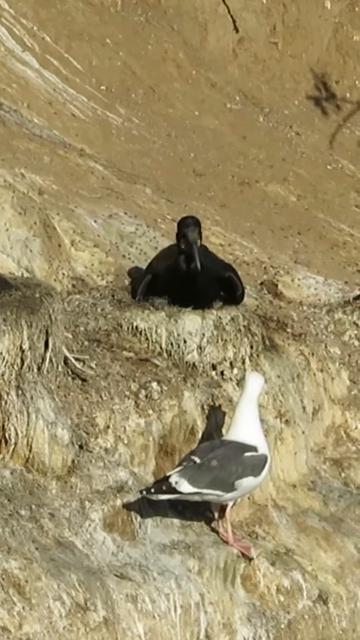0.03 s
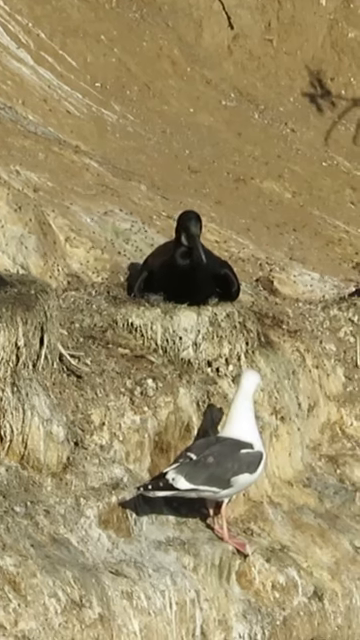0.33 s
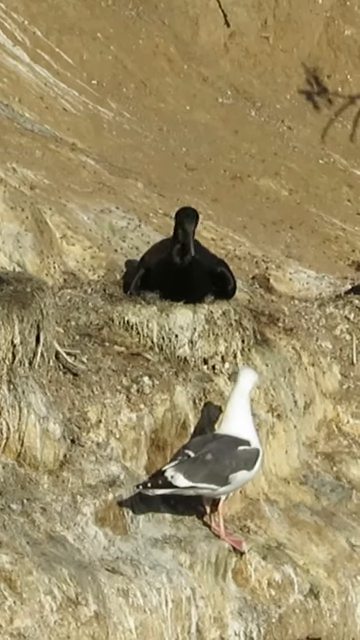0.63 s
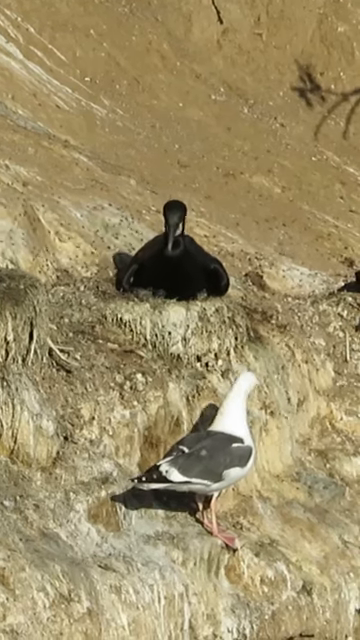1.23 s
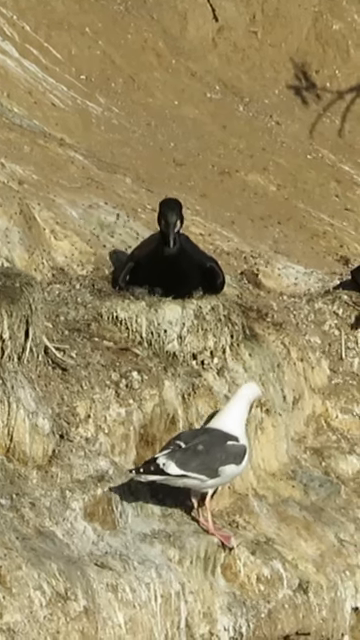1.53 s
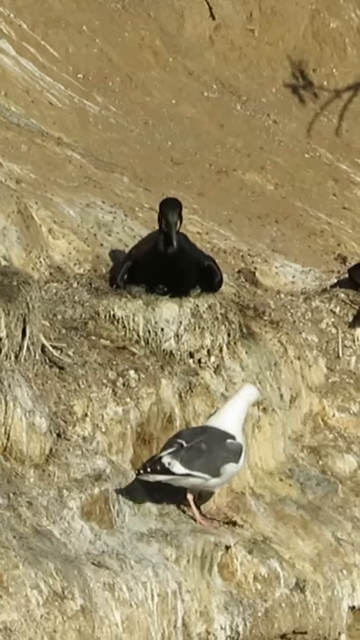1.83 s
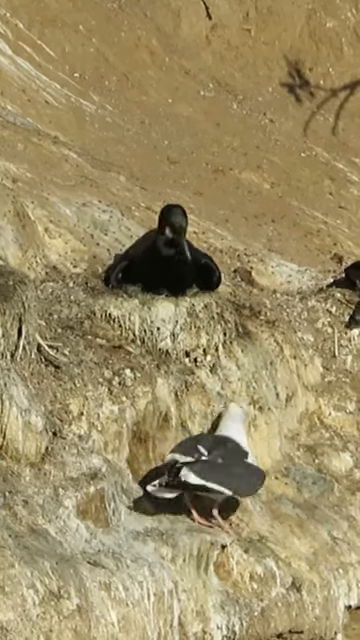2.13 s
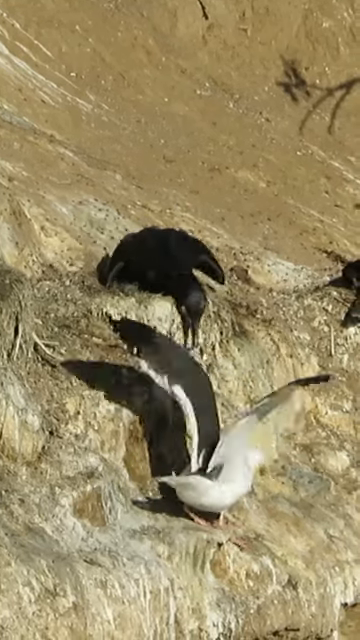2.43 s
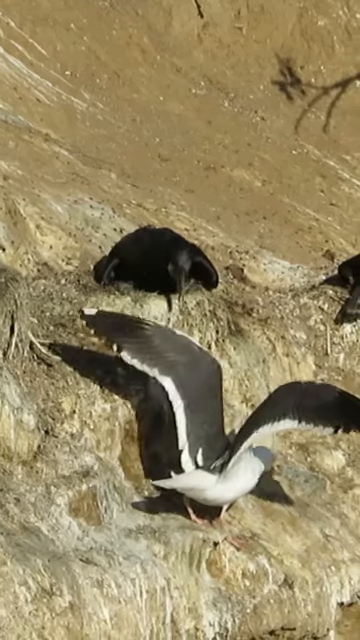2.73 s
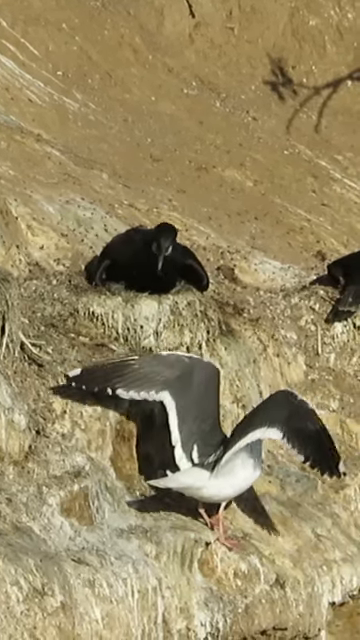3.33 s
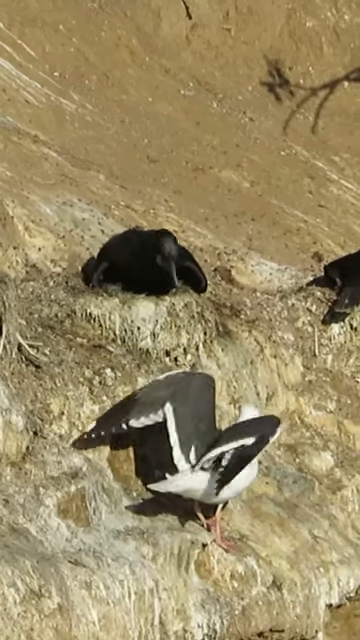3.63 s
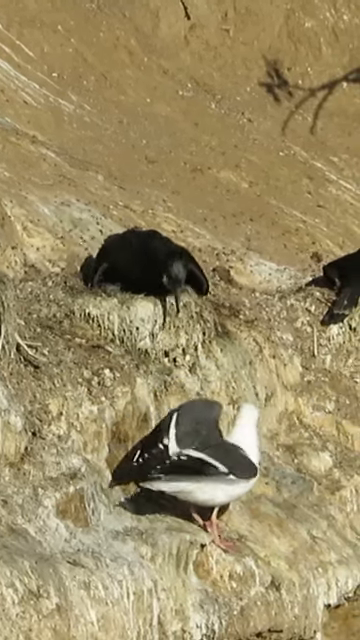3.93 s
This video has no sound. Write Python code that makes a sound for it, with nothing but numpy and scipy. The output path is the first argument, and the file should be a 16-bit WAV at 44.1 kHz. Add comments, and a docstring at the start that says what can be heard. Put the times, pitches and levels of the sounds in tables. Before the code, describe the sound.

Wind rumbles on the microphone at a sea cliff, with small gusts landing as soft, low thumps before easing off. A dull, steady roar of distant surf and a soft hiss continue underneath.

```python
"""Wind on a sea cliff

A soft, even hiss and a faint low drone lie under a dull, steady roar below 500 Hz (probably distant surf).
In the first two and a half seconds the breeze freshens: it rumbles on the microphone,
and single eddies, small swirls of air, thump it. The low sound is later and stronger on the right."""
import sys
import numpy as np
from scipy import signal
from scipy.fft import rfft, irfft
from scipy.io import wavfile

SR = 44100
rng = np.random.default_rng(int(sys.argv[2]) if len(sys.argv) > 2 else 0)


def put_to_file(sound):
    """Save the sound as 16-bit audio at rate SR, in the file named by the first command-line argument."""
    columns = np.atleast_2d(sound).T  # one column per channel
    safe = np.clip(columns, -1, 1)
    whole_steps = np.round(safe * 32767)
    wavfile.write(sys.argv[1], SR, whole_steps.astype(np.int16))


N = 176400
TIME = np.arange(N) / SR
BINS_HZ = np.maximum(np.arange(N // 2 + 1) * SR / N, 1)


def from_db(db):
    """Turn decibels into a number to multiply by."""
    return 10 ** (np.asarray(db) / 20)


def rms_one(x):
    """Scale a sound to an average strength (rms) of 1."""
    return x / np.sqrt(np.mean(x ** 2) + 1e-20)


def over_hz(points):
    """Read a table at every frequency, on a log axis."""
    hz, value = np.transpose(points)
    return np.interp(np.log(BINS_HZ), np.log(hz), value)


def noise(gain):
    """Noise whose tone is shaped by a gain for each frequency."""
    return rms_one(irfft(rfft(rng.standard_normal(N)) * gain, N))


def low_noise(colour, edge_hz=496.2, width_hz=4.8):
    """Noise shaped by a colour table, with its highs cut off steeply."""
    lows_only = 1 - np.tanh((BINS_HZ - edge_hz) / (2 * width_hz))
    return noise(from_db(over_hz(colour)) * lows_only)


def flutter(rate_hz=25):
    """A random wobble, typically of size 1."""
    return noise(1 / (1 + (BINS_HZ / rate_hz) ** 2))


# How strong the hiss is from low to high: f/Hz, relative level/dB
HISS_COLOUR = [(100, 3.5), (560, 0.5), (1000, -1), (2000, -2.5), (3200, -4.5), (4600, -8), (7500, -14.5),
               (11000, -21.5), (13500, -27.5), (15500, -33.5)]
# How alike the hiss is left and right: f/Hz, likeness (0 unrelated, 1 the same)
HISS_ALIKE = [(600, 0.054), (1400, 0.1), (3100, 0.018), (6800, 0.26), (10000, 0.39), (14000, 0.93)]
def hiss(level_db=-55.5, flutter_db=0.78):
    """A smooth hiss, wide in the middle range and narrower at the top."""
    colour = from_db(over_hz(HISS_COLOUR))
    alike = np.clip(over_hz(HISS_ALIKE), -.99, .99)
    shared, opposed = rfft(rng.standard_normal((2, N)))
    spectra = np.sqrt(1 + alike) * shared + np.sqrt(1 - alike) * opposed * [[1], [-1]]
    pair = irfft(colour * spectra, N)
    return from_db(level_db + flutter_db * flutter()) * rms_one(pair)


def drone(hz=73.6, width_hz=5.1, start_db=-46, fade_db_per_s=1.4):
    """A low resonance: a narrow band of noise that wavers and slowly fades."""
    band = 1 / (1 + ((BINS_HZ - hz) / width_hz) ** 2)
    return from_db(start_db - fade_db_per_s * TIME) * noise(band)


# How strong the roar is from low to high: f/Hz, relative level/dB
ROAR_COLOUR = [(15, -34), (35, -8.5), (65, -4.5), (120, -3), (165, -3), (210, -1.5), (260, -5.5), (310, -5),
               (380, -8), (440, -11.5), (475, -11), (500, -11)]
def roar(level_db=-42, flutter_db=1.42):
    """The dull, steady roar of faraway water and air."""
    return from_db(level_db + flutter_db * flutter()) * low_noise(ROAR_COLOUR)


# How the gusts rise and fall: t/s, level/dB
GUST_LEVELS = [(0, -56), (.27, -49), (.42, -44.5), (.7, -48.5), (.9, -56), (1.03, -43), (1.15, -53),
               (1.33, -38.5), (1.54, -43.5), (1.72, -54.5), (2.0, -48), (2.1, -57), (2.2, -44.5),
               (2.43, -45.5), (2.84, -53.5), (2.96, -44.5), (3.5, -56), (4, -63)]
# How strong the rumble is from low to high: f/Hz, relative level/dB
RUMBLE_COLOUR = [(15, -33), (30, -15), (55, -3.5), (80, -4.5), (130, -2.5), (200, -13.5), (400, -26.5)]
def wind_rumble():
    """Churning air rumbles on the microphone, louder with each gust."""
    gust_db = np.interp(TIME, *np.transpose(GUST_LEVELS))
    return from_db(gust_db) * low_noise(RUMBLE_COLOUR)


# Swirls of air that hit the microphone: t/s, level/dB, f/Hz, direction (+1 push, -1 pull)
EDDY_HITS = [(.377, -35, 75.5, -1), (0.43, -24.5, 108, -1), (0.558, -30, 86, -1), (0.78, -23.5, 101, -1),
             (1.023, -28.5, 85, 1), (1.046, -33.5, 72.6, -1), (1.29, -34.5, 65, -1), (1.326, -25.5, 84, 1),
             (1.380, -28, 100, 1), (1.416, -28, 75, 1), (1.434, -24, 106, -1), (1.465, -34, 99, -1),
             (1.519, -26, 86.5, -1), (1.553, -29.5, 100, -1), (1.606, -32, 100, 1), (1.657, -31.5, 135, 1),
             (1.903, -27.5, 115, -1), (1.913, -28.5, 100, -1), (2.003, -31, 75.4, -1),
             (2.178, -28, 67.6, -1), (2.221, -29.5, 61.3, 1), (2.256, -34, 65, 1), (2.380, -37, 99, -1),
             (2.433, -34, 80, 1), (2.603, -31.5, 66, 1), (2.958, -34, 91, -1), (3.107, -32, 101, -1),
             (3.371, -36, 65, 1)]
def eddies(rebound=0.22):
    """Each eddy thumps: one swing of pressure between two weaker opposite ones."""
    thumps = np.zeros(N)
    for at_s, peak_db, hz, direction in EDDY_HITS:
        passage = np.pi * hz * (TIME - at_s)
        # The rebound makes the swing after the thump stronger than the one before.
        swing = (1 - rebound * passage - 2 * passage ** 2) * np.exp(-passage ** 2)
        thumps += direction * from_db(peak_db) * swing
    return thumps


# How much louder the low sound is on the right than on the left: f/Hz, level/dB
RIGHT_BOOST = [(25, 1.2), (50, 2.8), (75, 4.2), (125, 5.2), (200, 3.3), (300, .8), (480, .5)]
# How far the right side trails the left: f/Hz, phase lag/rad
RIGHT_LAG = [(30, .02), (60, .18), (100, .7), (135, 1.25), (200, 1.7), (300, 1.98), (500, 2.15)]
def lean_right(x):
    """Make a sound stronger and later on the right; each side takes half the change."""
    lean = from_db(over_hz(RIGHT_BOOST) / 2) * np.exp(-.5j * over_hz(RIGHT_LAG))
    return irfft(rfft(x) * np.array([1 / lean, lean]), N)


def scene():
    """The four low sounds lean to the right, with the hiss spread around them."""
    low_sound = wind_rumble() + eddies() + roar() + drone()
    return lean_right(low_sound) + hiss()


def record(dry, start_s=0.0451, fade_in_s=0.0025, stop_hz=16150):
    """The sound starts after a moment of silence; the very highest treble is cut away."""
    fade_in = np.clip((TIME - start_s) / fade_in_s, 0, 1)
    treble_cut = signal.cheby2(20, 70, stop_hz, fs=SR, output="sos")
    return signal.sosfilt(treble_cut, dry * fade_in)


dry = scene()
out = record(dry)
put_to_file(out)
```